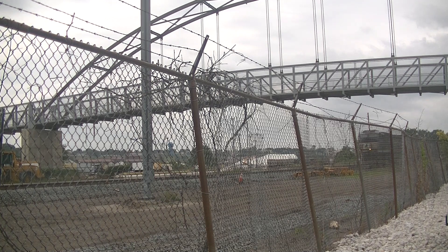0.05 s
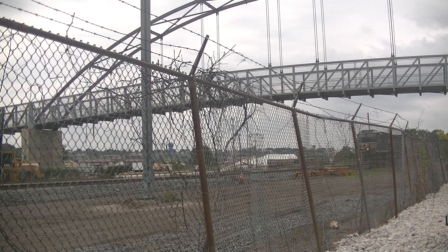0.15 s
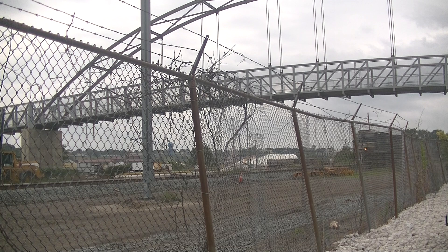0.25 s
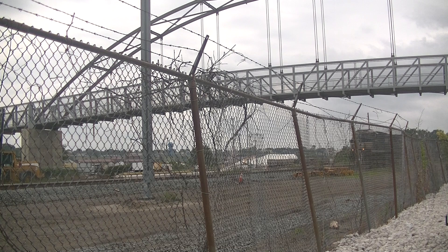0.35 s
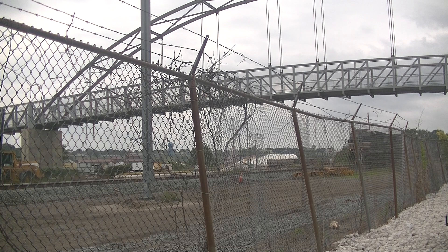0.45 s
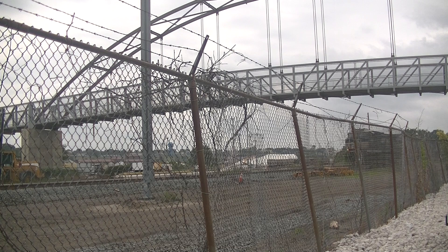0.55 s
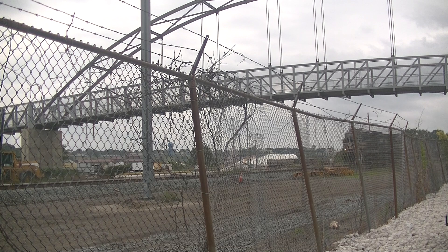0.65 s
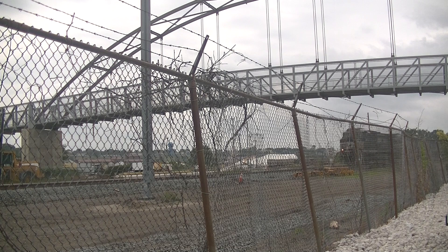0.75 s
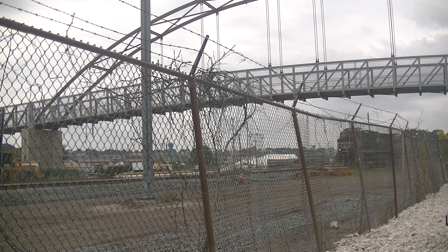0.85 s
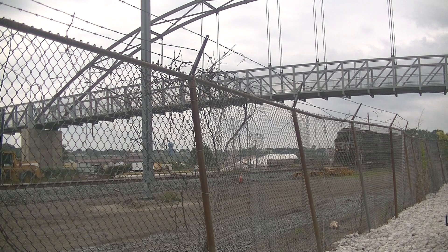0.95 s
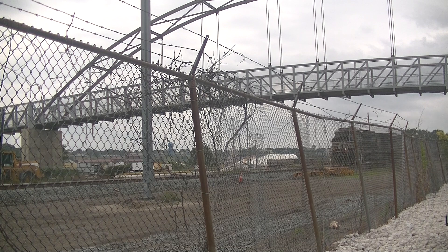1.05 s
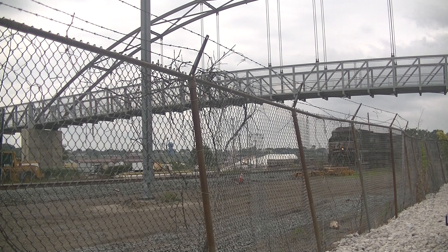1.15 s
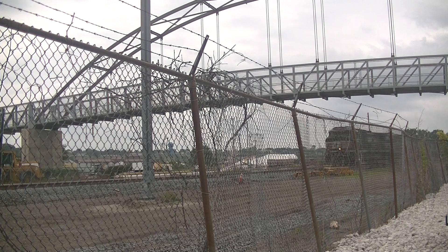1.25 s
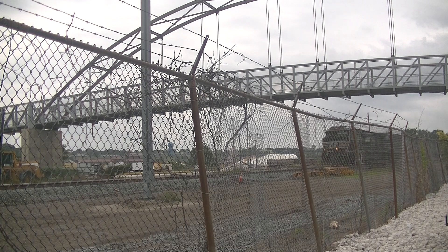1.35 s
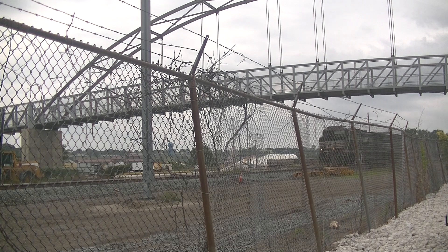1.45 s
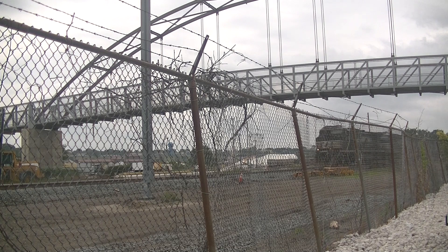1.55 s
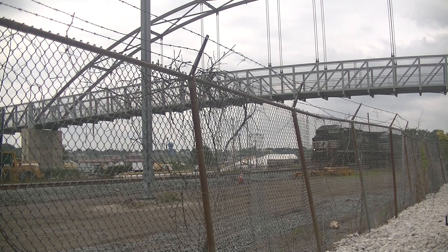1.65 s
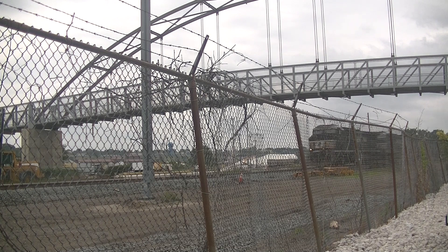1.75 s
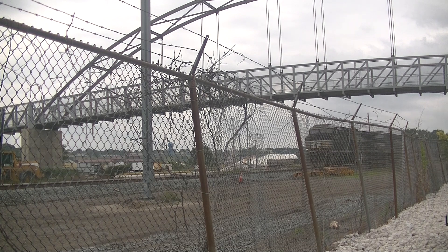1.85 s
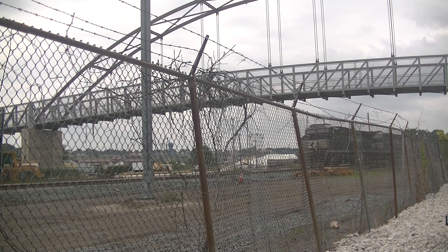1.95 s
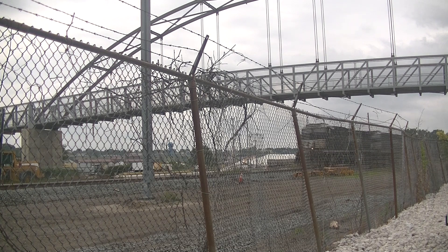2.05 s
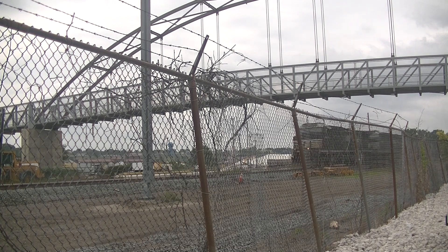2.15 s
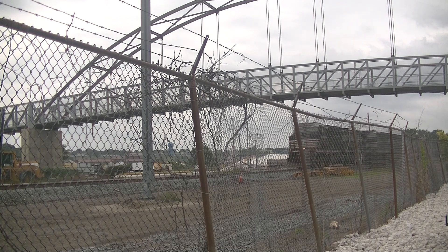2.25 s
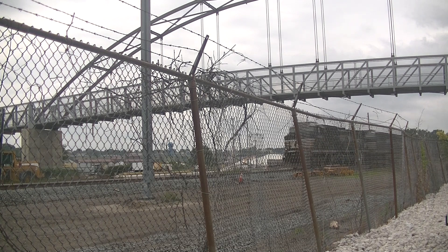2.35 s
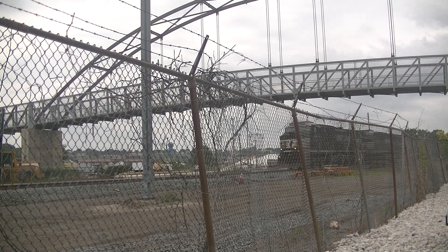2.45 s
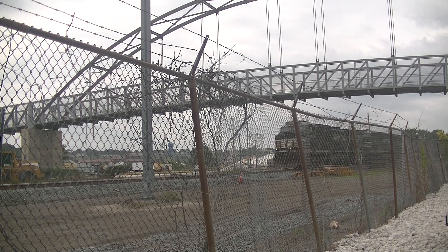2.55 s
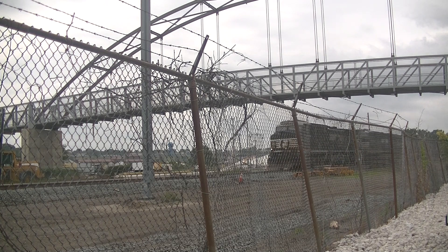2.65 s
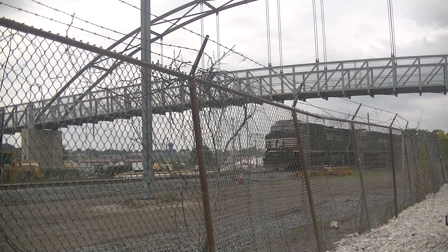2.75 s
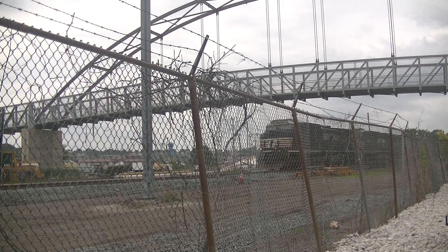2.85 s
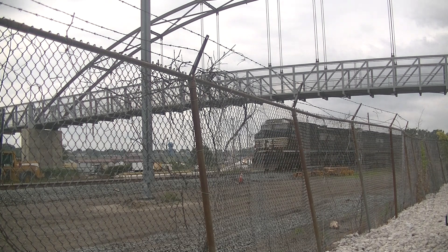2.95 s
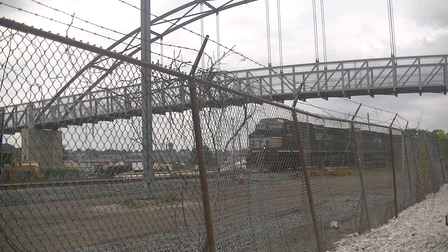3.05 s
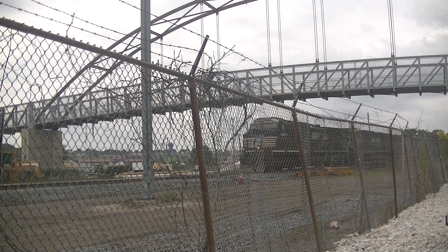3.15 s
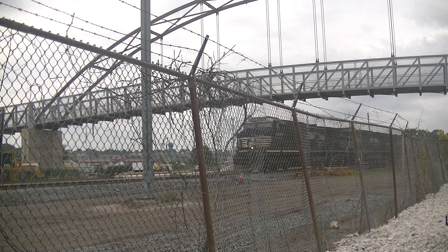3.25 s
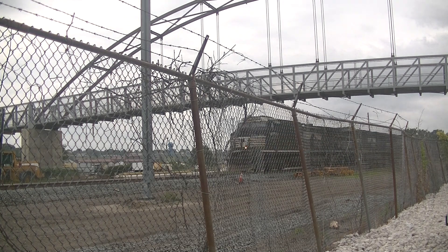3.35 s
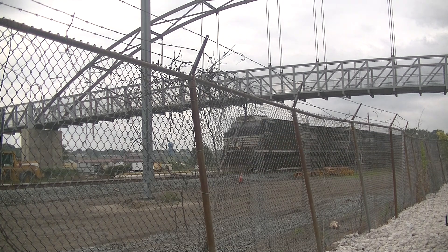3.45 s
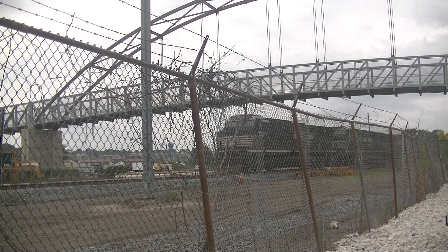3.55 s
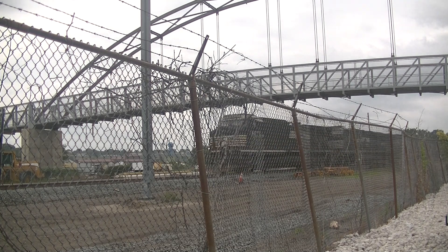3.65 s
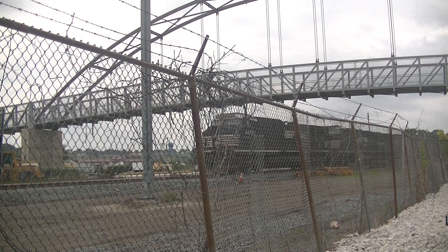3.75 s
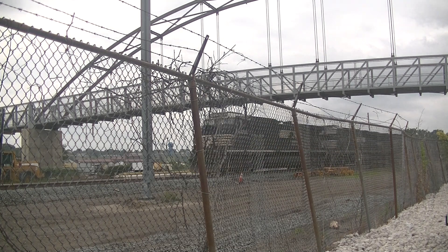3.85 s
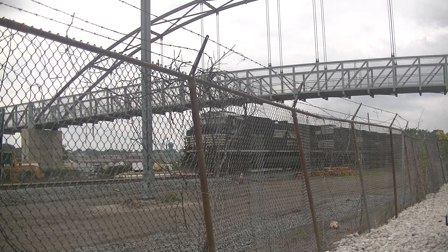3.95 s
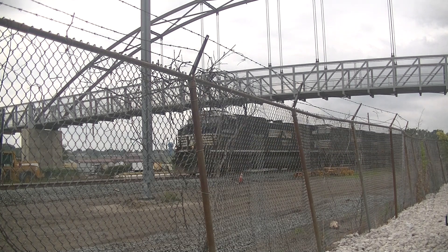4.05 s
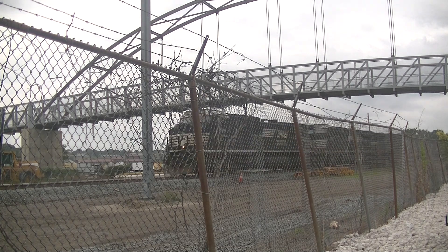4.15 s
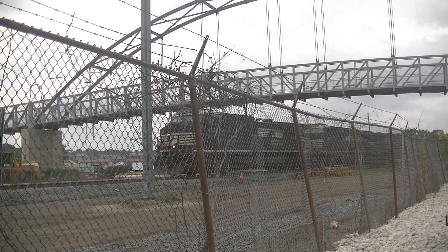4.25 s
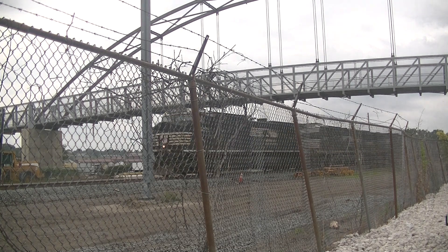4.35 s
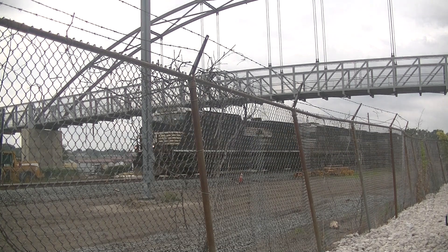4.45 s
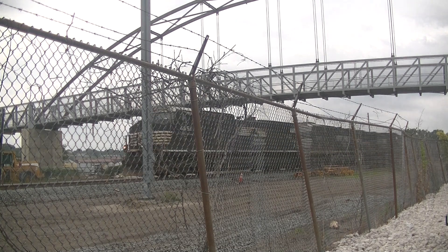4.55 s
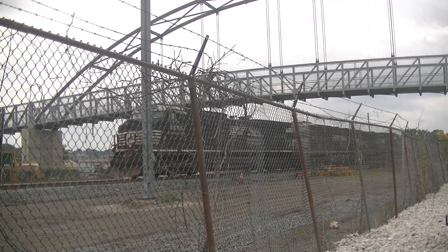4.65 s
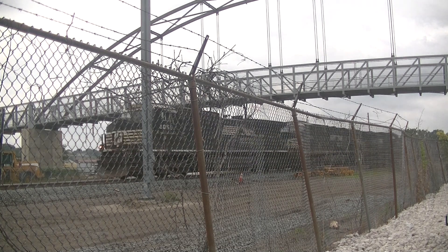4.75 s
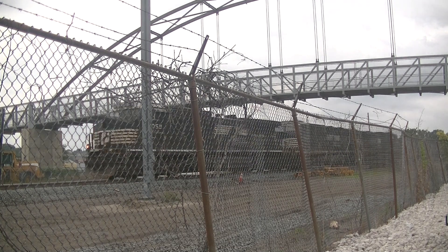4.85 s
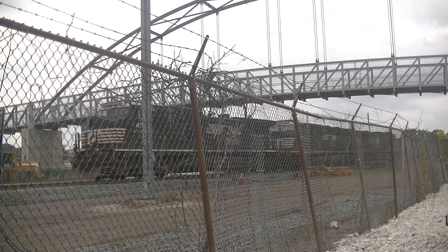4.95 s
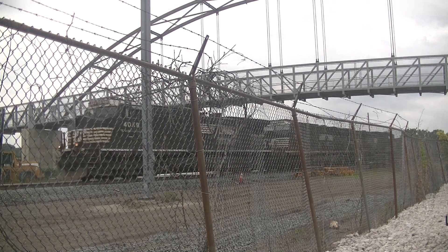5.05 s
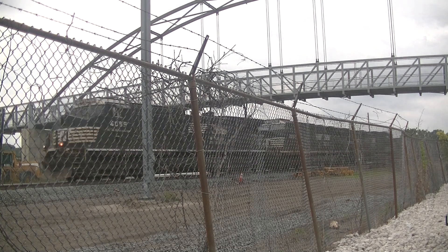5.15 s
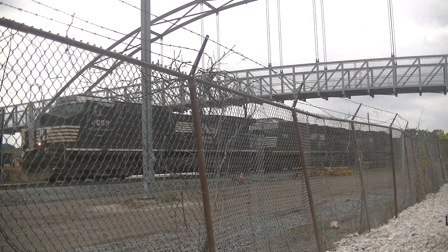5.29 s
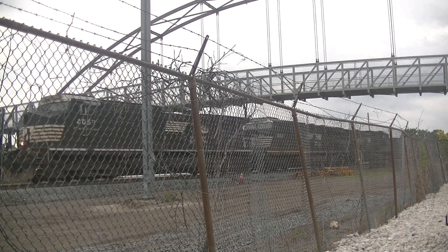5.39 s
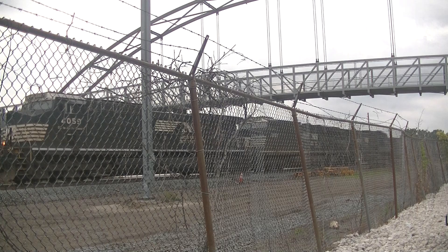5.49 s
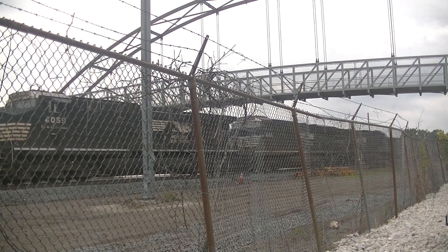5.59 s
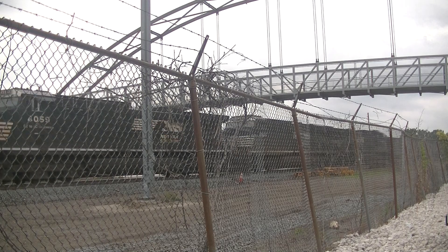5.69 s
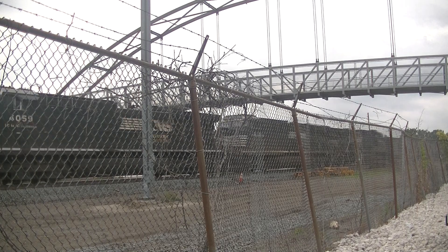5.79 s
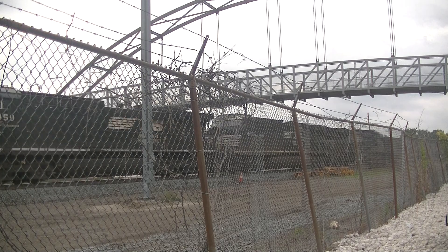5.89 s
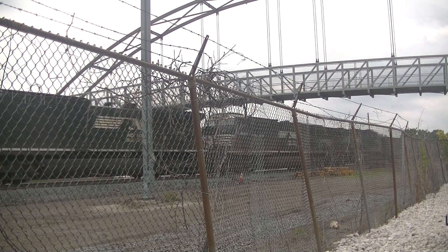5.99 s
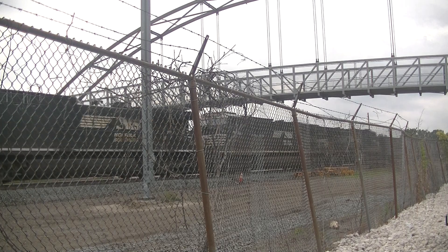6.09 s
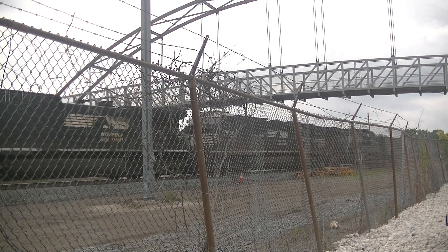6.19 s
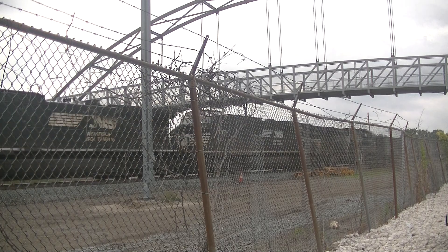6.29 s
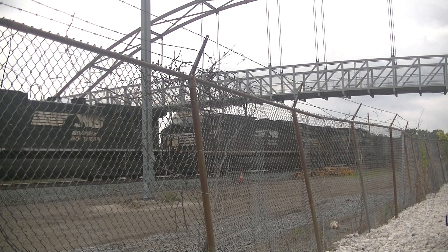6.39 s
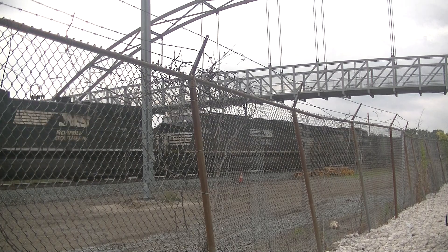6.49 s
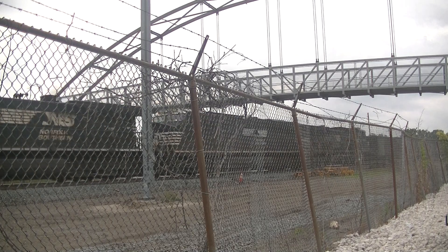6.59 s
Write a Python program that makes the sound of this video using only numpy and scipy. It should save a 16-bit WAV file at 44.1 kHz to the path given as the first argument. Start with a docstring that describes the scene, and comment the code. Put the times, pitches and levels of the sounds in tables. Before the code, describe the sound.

Diesel locomotives with a freight train approach and pass close, wheels roaring, gears howling and flanges grinding and squealing on the rail.

```python
"""At a yard fence, diesel locomotives with a freight train approach and pass, mostly on the left.
Rough wheels roar on the rails, traction gears howl, machinery hums and turbochargers whistle.
Close by, flanges grind on the rail and set the wheels ringing. A faint tick repeats.
A short clank sounds at the start. Wind eddies pop on the left microphone port."""
import sys
import numpy as np
from scipy import signal
from scipy.fft import rfft, irfft, next_fast_len
from scipy.io import wavfile

SR = 44100
rng = np.random.default_rng(int(sys.argv[2]) if len(sys.argv) > 2 else 0)


def pcm_store(signal):
    """Save signal as 16-bit PCM."""
    levels = np.round(np.clip(np.atleast_2d(signal), -1, 1) * 32767)
    wavfile.write(sys.argv[1], SR, levels.astype(np.int16).T)


N = 292148
T = np.arange(N) / SR
FFT_SIZE = next_fast_len(N + SR // 10, real=True)
FREQ = np.fft.rfftfreq(FFT_SIZE, 1 / SR)
SPEED_M_S, TRACK_M, FRONT_ABREAST_S = 15, 24, 5.235

# Table levels are relative.
# wheel-rail roar spectrum (frequency [Hz], level [dB])
ROAR = [(300, -49), (550, -9.5), (680, -6.5), (850, -1.5), (930, -6), (1060, -1), (1180, -1.5), (1420, 0.5),
        (1780, -4), (2050, -3.5), (2400, -3.5), (3000, -8.5), (3800, -12), (4500, -15), (7000, -25.5),
        (8000, -38.5), (15000, -44.5)]
# track bed spectrum (frequency [Hz], level [dB])
RUMBLE = [(25, -63), (50, -53), (75, -35), (120, -33), (170, -23), (230, -26), (310, -5), (430, 0),
          (560, 9), (750, -20), (1200, -24)]
# axles over track dips (time [s], level [dB])
THUDS = [(3.0, -44), (4.06, -41), (4.22, -33), (4.73, -31), (4.99, -30.5), (5.14, -29.5), (5.522, -27.5),
         (6.1, -33.5), (6.25, -34.5)]
ROAR_DB, RUMBLE_DB, THUD_RISE_S, THUD_T60_S = -21.5, -37, 0.037, 1

# driven bogies (abreast [s], mesh [Hz], width [Hz], beam half-width [m], level abreast [dB])
BOGIES = [(5.12, 1226, 150, 9.9, -28.5), (5.4, 1084, 34, 10.6, -27), (5.92, 1090, 80, 10.3, -26),
          (6.28, 1072, 30, 8, -22.5), (6.52, 1019, 80, 3.7, -23.5)]
# traction motors (mesh rate [ratio], level [dB])
MOTORS = [(.965, -8.5), (1, -1.5), (1.025, -6.5)]
# gears of the rear units (mesh [Hz], width [Hz], level [dB])
REAR_GEARS = [(1400, 110, -44), (1210, 100, -35.5), (1125, 100, -39.5)]
# a short clank at the start, then howl surges (time [s], length [s], pitch [Hz], level [dB])
CLANK_AND_SURGES = [(.022, .014, 1350, -29), (5.135, .03, 1240, -23), (5.2, .03, 1160, -23),
                    (5.475, .034, 1082, -19), (5.725, .13, 1066, -25.5), (6.083, .035, 1060, -20),
                    (6.182, .04, 1065, -20)]
NEAR_STEADY, FAR_STEADY, GEAR_WANDER, OFF_BEAM_DB = 1.2, .45, .007, -18.5

# flange contacts (start [s], full [s], release [s], t60 [s], level [dB])
RUBS = [(0.2, 0.354, 0.41, 0.37, -54.5), (1.093, 1.37, 1.45, 1.3, -54), (2.712, 2.92, 2.78, 2.4, -49),
        (4.093, 4.135, 4.88, 2.34, -42.5), (5.487, 5.726, 5.81, 1.06, -37.5), (6.495, 6.534, 7, 0.82, -43)]
# flange rasp spectrum (frequency [Hz], level [dB])
RASP = [(1200, -38), (2150, 2), (2500, 4.5), (2900, 2), (3250, 5), (3650, -2.5), (4000, 0), (4700, -0.5),
        (5200, -2.5), (6700, -4), (7800, -17.5), (10000, -25)]
# flange hiss spectrum (frequency [Hz], level [dB])
HISS = [(3000, -36), (6000, 8.5), (8600, 0.5), (9800, 1), (11300, -2.5), (13500, -0.5), (15700, -6)]
# flange bites (time [s], pitch [Hz], level [dB])
BITES = [(4.135, 2490, -23), (5.6, 2380, -26), (6.54, 2450, -29)]
LIGHT_RUB_DB, BITE_WIDTH_HZ, BITE_RISE_S, BITE_T60_S = -58, 420, .02, .7
AIR_HZ, AIR_DB_PER_M = 10300, 1

# modes of six wheels (frequency [Hz], width [Hz], level [dB])
WHEEL_A = [(3840, 110, -34), (3940, 18, -31.5), (3984, 14, -32), (4560, 110, -37), (4850, 110, -38),
           (6616, 60, -43), (6970, 50, -46), (7510, 50, -50), (8360, 60, -51), (8882, 40, -51)]
WHEEL_B = [(3890, 120, -39), (4635, 70, -47), (5720, 50, -43), (6490, 140, -41), (6560, 120, -41),
           (6609, 32, -35.5), (6671, 36, -38), (6950, 70, -48), (7520, 70, -52), (8403, 60, -52),
           (9286, 40, -53), (10200, 120, -54), (10750, 60, -60), (11860, 60, -60), (13507, 60, -61)]
WHEEL_C = [(3170, 70, -37), (3260, 80, -37), (3850, 40, -39), (4517, 30, -36.5), (5238, 30, -39.5),
           (6040, 28, -39), (7434, 45, -32.5), (7888, 35, -46.5), (8323, 70, -44.5), (9200, 45, -49),
           (10056, 45, -48.5), (10220, 45, -52), (10648, 40, -53), (10912, 45, -49), (11014, 40, -53),
           (11612, 40, -53), (12170, 45, -55), (12554, 55, -56), (13544, 80, -57), (14163, 60, -59)]
WHEEL_D = [(2530, 110, -37), (3068, 50, -38), (3137, 26, -31.5), (3400, 100, -38), (3860, 40, -33.5),
           (3940, 70, -39), (4635, 50, -43)]
WHEEL_E = [(3075, 60, -36), (3854, 20, -32), (4780, 80, -42), (5150, 90, -42), (6995, 70, -43),
           (8700, 90, -51)]
WHEEL_F = [(2060, 90, -40), (2204, 16, -34), (2310, 36, -36)]
# near squeals (wheel modes, start [s], full [s], release [s], t60 [s], level [dB])
NEAR_SQUEALS = [(WHEEL_A, 4.14, 4.33, 4.44, .45, 4.2), (WHEEL_F, 4.05, 4.3, 4.7, .4, 2),
                (WHEEL_B, 4.23, 4.56, 4.83, .6, 3.3), (WHEEL_D, 4.74, 4.85, 5.03, .75, 1.2),
                (WHEEL_E, 5.6, 5.78, 5.9, .6, 2.5), (WHEEL_C, 5.76, 5.88, 5.96, .75, 3.2)]
# distant squeals (start [s], end [s], first pitch [Hz], last pitch [Hz], level [dB])
FAR_SQUEALS = [(.36, .56, 3980, 3920, -46), (1, 1.55, 4200, 4130, -46), (2.05, 2.6, 4150, 4280, -46.5),
               (1.7, 2.3, 10200, 10300, -66), (2.2, 2.65, 10300, 10480, -63)]
SQUEAL_STEADY, SQUEAL_WAVER = .6, .0015

# machinery fundamental (time [s], pitch [Hz])
HUM_PITCH = [(0, 270.5), (2.5, 269.7), (4, 268.5), (5.2, 266.8), (6.62, 264.5)]
# hum lines of each unit (harmonic, width [Hz], level [dB])
FIRST_UNIT_LINES = [(1, 4.7, -0.5), (2, 12, 0), (4, 23, -5)]
SECOND_UNIT_LINES = [(1, 11.2, -1.25), (2, 21, -4), (3, 15, 1)]
# hum swells; only rows for harmonics 3 and 6 sound, rows for the fundamental are unused (harmonic, start [s],
# full [s], release [s], level [dB])
HUM_SWELLS = [(3, 0.3, 1.8, 2.14, -42.5), (3, 2.45, 2.52, 2.95, -35.5), (1, 1.55, 1.7, 1.85, -49.5),
              (1, 3.05, 3.3, 3.6, -41.5), (3, 3.05, 3.4, 4.1, -35), (6, 3.35, 3.42, 4, -36.5),
              (1, 4.95, 5.1, 6.15, -37.5), (3, 6.08, 6.18, 6.48, -30)]
HUM_DB, THIRD_DB, SIXTH_DB, SWELL_T60_S = -42.5, -36.5, -43.5, 1.8
# whistle, one curve per turbocharger (time [s], pitch [Hz], level [dB])
TURBOS = [
    [(0, 3550, -60), (.8, 3540, -55), (1.05, 3538, -45), (1.5, 3530, -46), (2.2, 3500, -43),
     (2.7, 3468, -40), (3.1, 3460, -41), (3.5, 3388, -37), (3.8, 3365, -38), (4, 3320, -41),
     (5.4, 3228, -41), (6.62, 3080, -41)],
    [(3.2, 3505, -65), (3.5, 3495, -43), (3.8, 3480, -37.5), (4.2, 3470, -40), (4.8, 3440, -60)],
]
# exhaust spectrum (frequency [Hz], level [dB])
EXHAUST = [(40, -44), (85, -12), (130, -2.5), (185, 0), (260, 3), (400, -3.5)]
EXHAUST_DB = -54.5

# wind eddies (time [s], pitch [Hz], level [dB])
POPS = [(.261, 560, -11), (.284, 651, -12), (.535, 280, -19), (.577, 400, -12.5), (0.93, 650, -5),
        (1.205, 420, -14.5), (1.333, 330, -19), (1.975, 360, -17), (2.314, 380, -19), (2.356, 352, -19),
        (2.694, 353, -19), (3.151, 350, -18)]
# port response to eddies (frequency [Hz], gain [dB])
PORT = [(50, -34), (110, -22), (220, -2), (400, 0)]
# tick spectrum (frequency [Hz], level [dB])
TICK = [(2000, -18), (5000, 10), (7000, 7), (9000, 1.5), (15000, -11)]
TICK_START_S, TICK_PERIOD_S = .018, .334

# right port against left (frequency [Hz], gain [dB])
RIGHT_PORT = [(60, -8), (110, -4.5), (200, -3), (380, -10.5), (700, -12.5), (1290, -12.5), (2380, -12),
              (4400, -6), (8000, -9), (15000, -6.5)]
# scattered share at the right port (frequency [Hz], share [dB])
SCATTER = [(60, 0), (130, -2), (290, -2.5), (640, -16), (1400, -1.5), (3100, -2), (6800, -1), (15000, 0.5)]
SWING_DB, SWING_S = 3, 5.3  # right port dips as the first unit passes
CEILING, TOP_HZ = .97, 15700


def rolling():
    """Rough treads make rails and wheels roar; the track bed rumbles under load, thuds under axles."""
    roar = rush(ROAR, flicker_db=1, rate_hz=40) * undb(ROAR_DB) * approach()
    thud_power = sum((undb(db) * envelope(s - THUD_RISE_S, s, s, THUD_T60_S)) ** 2 for s, db in THUDS)
    load = np.sqrt((undb(RUMBLE_DB) * approach()) ** 2 + thud_power)
    return roar + rush(RUMBLE, flicker_db=2.5, rate_hz=35) * load


def traction():
    """Gear howl beams sideways: each bogie swells and sinks in pitch as it passes. Rear units blur."""
    out = sum(gears(hz, width_hz, FAR_STEADY) * undb(db) for hz, width_hz, db in REAR_GEARS)
    for abreast_s, hz, width_hz, beam_m, db in BOGIES:
        along_m = ahead_m(abreast_s)
        closing_m_s = SPEED_M_S * along_m / np.hypot(along_m, TRACK_M)
        doppler = 1 / (1 - closing_m_s / 343)
        beam_db = OFF_BEAM_DB * (1 - np.exp(-(along_m / beam_m) ** 2))
        out += gears(hz * doppler, width_hz, NEAR_STEADY) * undb(db + beam_db) * nearness(along_m)
    return out


def gears(hz, width_hz, steady):
    """Traction motors beat against each other and throb as the shafts turn."""
    hz = hz * (1 + GEAR_WANDER * walk(7))
    mesh = sum(undb(db) * ring(hz * ratio, width_hz, steady) for ratio, db in MOTORS)
    octave = ring(2.03 * hz, 70) * undb(-7)
    throb = 1 + .16 * ring(38, 25)
    return (mesh + octave) * throb


def clank_and_surges():
    """A short clank at the start, then brief surges of the gear howl."""
    return sum(ring(hz, 50, steady=1.5) * undb(db) * np.exp(-(2 * (T - s) / length_s) ** 2)
               for s, length_s, hz, db in CLANK_AND_SURGES)


def flanges():
    """Rubbing rasps and, pressed harder, hisses; a hard contact opens with a scrape."""
    rub_power = sum((undb(db) * envelope(*shape)) ** 2 for *shape, db in RUBS)
    rub_db = 10 * np.log10((undb(LIGHT_RUB_DB) * approach() ** 0.22) ** 2 + rub_power)
    rasp = rush(RASP, flicker_db=2, rate_hz=45, ripple_db=0.9) * undb(np.minimum(rub_db, -41) + 17)
    hiss = rush(HISS, flicker_db=1.2, rate_hz=100, ripple_db=3.8) * undb(rub_db + 5.5)
    bites = sum(ring(hz, BITE_WIDTH_HZ) * undb(db) * envelope(s - BITE_RISE_S, s, s, BITE_T60_S)
                for s, hz, db in BITES)
    return rasp + through_air(hiss) + bites


def squeals():
    """Rubbed wheels sing in their modes and ring out; distant ones swell and glide faintly."""
    out = 0
    for modes, *shape, squeal_db in NEAR_SQUEALS:
        waver = 1 + SQUEAL_WAVER * walk(25)  # contact point shifts
        wheel = sum(undb(db) * ring(hz * waver, width_hz, SQUEAL_STEADY) for hz, width_hz, db in modes)
        out += envelope(*shape) * wheel * undb(squeal_db)
    for start_s, end_s, first_hz, last_hz, db in FAR_SQUEALS:
        progress = np.clip((T - start_s) / (end_s - start_s), 0, 1)
        hz = (first_hz + (last_hz - first_hz) * progress) * (1 + .006 * walk(14))
        out += ring(hz, first_hz / 50) * np.sin(np.pi * progress) * undb(db)
    return out


def machinery():
    """Two units hum at slightly different speeds; the first one's harmonics 3 and 6 swell at times."""
    hz, = curves(HUM_PITCH)
    distance_gain = nearness(ahead_m(FRONT_ABREAST_S)) ** 1.13
    first = sum(undb(db) * ring(round(k) * hz, width_hz, steady=1)
                for k, width_hz, db in FIRST_UNIT_LINES)
    second = sum(undb(db) * ring(round(k) * hz * 1.075, width_hz, steady=0.98)
                 for k, width_hz, db in SECOND_UNIT_LINES)
    out = (first + second) * undb(HUM_DB) * distance_gain
    for harmonic, base_db in (3, THIRD_DB), (6, SIXTH_DB):
        swell_power = sum((undb(db) * envelope(*shape, SWELL_T60_S)) ** 2
                          for k, *shape, db in HUM_SWELLS if k == harmonic)
        gain = np.sqrt((undb(base_db) * distance_gain) ** 2 + swell_power)
        out += ring(harmonic * hz, 14, steady=1) * gain
    return out


def turbochargers():
    """Two whistles, slowly falling in pitch."""
    return sum(ring(hz + 9 * walk(8), 30, steady=1) * undb(db) for hz, db in map(curves, TURBOS))


def exhaust():
    """Dull drone, growing on approach."""
    return rush(EXHAUST, flicker_db=1, rate_hz=25) * undb(EXHAUST_DB) * approach() ** 0.56


def wind_pops():
    """Each eddy is one pressure swing, down then up; the port passes little of its bass."""
    out = np.zeros(N)
    for s, hz, db in POPS:
        phase = 2 * np.pi * hz * (T - s)
        out += undb(db) * phase * np.exp((1 - np.minimum(phase ** 2, 200)) / 2)
    return filtered(out, response(PORT))


def ticks():
    """Thin, dry tick, three a second."""
    age_s = (T - TICK_START_S) % TICK_PERIOD_S
    return rush(TICK, flicker_db=2, rate_hz=200) * np.exp(-age_s / .005) * undb(-39.5)


def through_air(x):
    """Air absorbs the top treble while the train is distant."""
    treble = filtered(x, 1 - 1 / (1 + (FREQ / AIR_HZ) ** 8))
    extra_m = TRACK_M / approach() - TRACK_M
    return x - treble * (1 - undb(-AIR_DB_PER_M * extra_m))


def ahead_m(abreast_s):
    """Track left to cover until abreast."""
    return SPEED_M_S * (abreast_s - T)


def nearness(along_m):
    """Inverse-distance gain; 1 abreast."""
    return TRACK_M / np.hypot(along_m, TRACK_M)


def approach():
    """Gain of the long train: rises until its front is abreast, then holds."""
    return nearness(np.maximum(ahead_m(FRONT_ABREAST_S), 0))


def rush(spectrum, flicker_db, rate_hz, ripple_db=0., bands=5):
    """Noise in interleaved bands that flicker independently; ripple is the small resonances of steel."""
    knots = rng.standard_normal(512)
    ripple = np.interp(FREQ, np.linspace(0, SR / 2, len(knots)), knots)
    roll_off = np.minimum(spectrum[-1][0] / (FREQ + 1), 1) ** 2
    bins = rfft(rng.standard_normal(FFT_SIZE)) * response(spectrum) * roll_off * undb(ripple_db * ripple)
    band = (2 * np.log2(FREQ + 1)).astype(int) % bands
    return unit(sum(irfft(bins * (band == k), FFT_SIZE)[:N] * undb(flicker_db * walk(rate_hz))
                    for k in range(bands)))


def ring(hz, width_hz, steady=0., hop=64):
    """Resonance driven by random pushes; steady adds a self-sustained tone."""
    pushes = rng.standard_normal((N // hop + 2, 2)) @ [1, 1j]
    pole = np.exp(-2 * np.pi * width_hz * hop / SR)
    swing = unit(signal.lfilter([1], np.poly([pole, pole]), pushes)) + steady
    swing = np.interp(np.arange(N) / hop, np.arange(len(swing)), swing)
    phase = 2 * np.pi * np.cumsum(np.broadcast_to(hz, N)) / SR
    return unit(np.real(swing * np.exp(1j * phase)))


def walk(rate_hz):
    """Smooth random drift, rms 1."""
    knots = rng.standard_normal(4096)
    return unit(np.interp(T * rate_hz, np.arange(len(knots)), knots))


def envelope(start_s, full_s, release_s, t60_s):
    """Linear rise, hold, exponential fade."""
    rise = np.clip((T - start_s) / max(full_s - start_s, 1e-3), 0, 1)
    return rise * undb(-60 * np.maximum(T - release_s, 0) / t60_s)


def curves(rows):
    """Columns of a time table, per sample."""
    s, *columns = np.transpose(rows)
    return [np.interp(T, s, column) for column in columns]


def response(points):
    """Gain per bin from (frequency [Hz], level [dB]) points."""
    hz, db = np.transpose(points)
    return undb(np.interp(np.log(FREQ + 1), np.log(hz), db))


def filtered(x, gain):
    """Apply a gain per bin."""
    return irfft(rfft(x, FFT_SIZE) * gain, FFT_SIZE)[:N]


def undb(db):
    """Decibels to gain."""
    return 10 ** (np.asarray(db) / 20)


def unit(x):
    """Scale to rms 1."""
    return x / np.sqrt(np.mean(np.abs(x) ** 2))


def scene():
    """The left port faces the train; the right gets less, partly scattered by ground and bridge."""
    train = rolling() + machinery() + turbochargers() + exhaust() + traction()
    train = (train + clank_and_surges() + flanges() + squeals() + ticks()) * undb(5.5)
    echoes = rng.standard_normal(N) * np.exp(-T / .05)
    scattered = signal.fftconvolve(train, echoes / np.linalg.norm(echoes))[:N]
    share = np.clip(response(SCATTER), 0, 1)
    right = filtered(train, np.sqrt(1 - share ** 2) * response(RIGHT_PORT))
    right += filtered(scattered, share * response(RIGHT_PORT))
    right *= undb(-SWING_DB * nearness(ahead_m(SWING_S)) ** 2)
    wind = wind_pops()
    return np.array([train + wind, right - undb(-9.5) * wind])


def record(dry):
    """The recorder rounds the highest peaks, then cuts deep bass and top."""
    rounded = dry / (1 + (dry / CEILING) ** 8) ** (1 / 8)
    thin = signal.sosfilt(signal.butter(2, 60, "high", fs=SR, output="sos"), rounded)
    return signal.sosfilt(signal.ellip(10, .2, 80, TOP_HZ, fs=SR, output="sos"), thin)


dry = scene()
out = record(dry)
pcm_store(out)
```